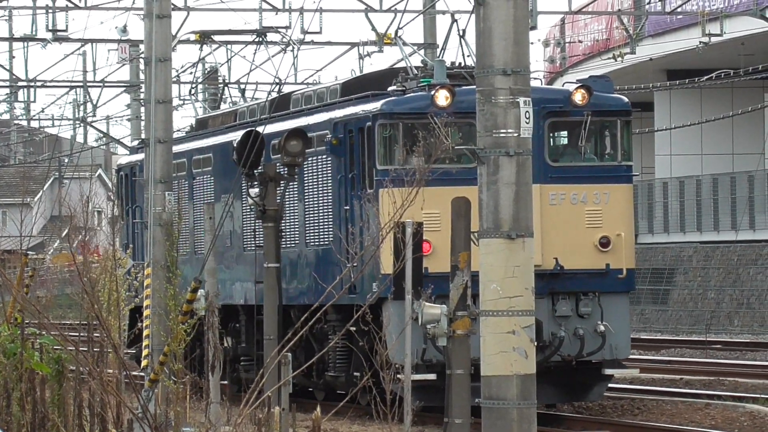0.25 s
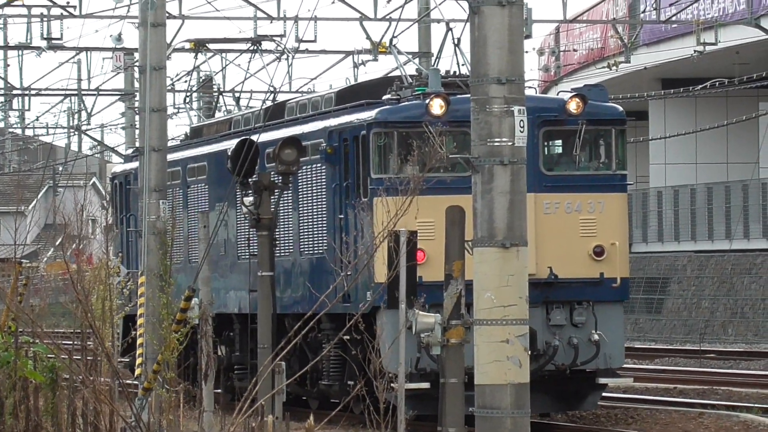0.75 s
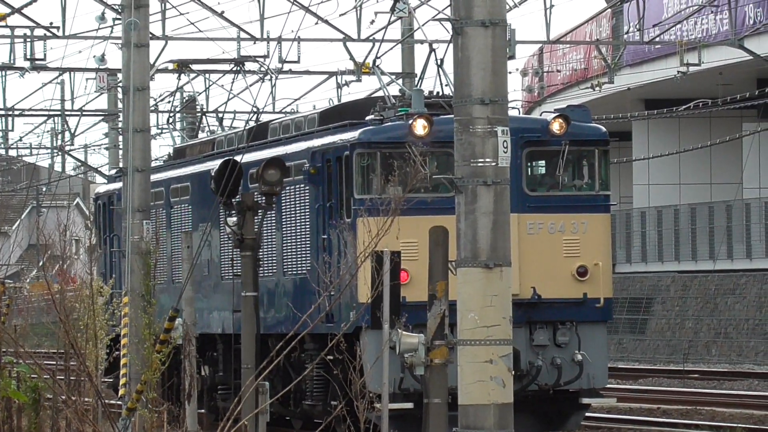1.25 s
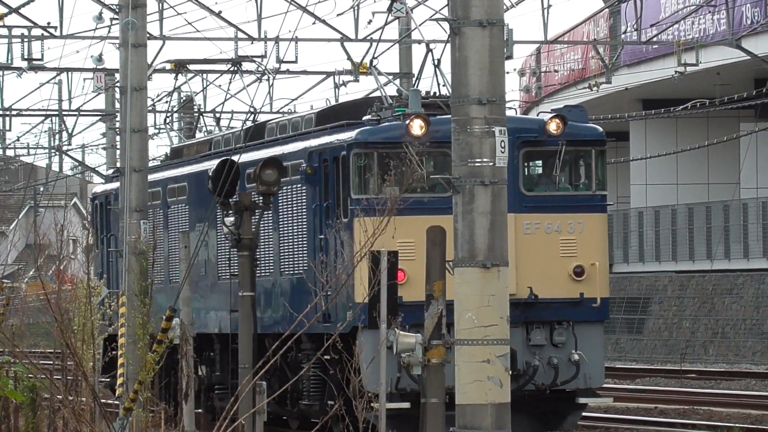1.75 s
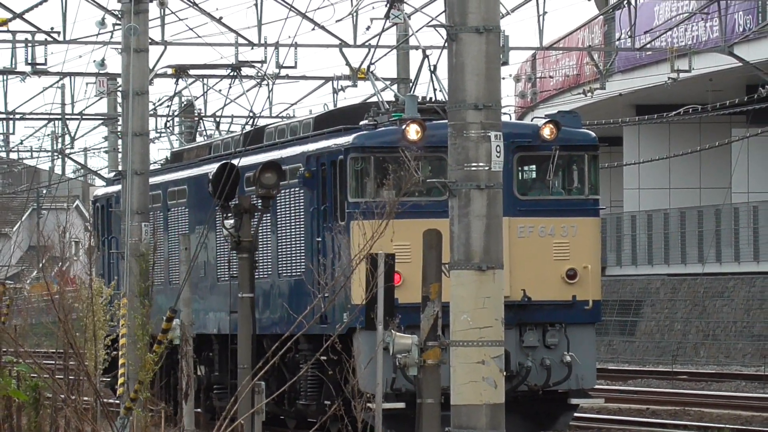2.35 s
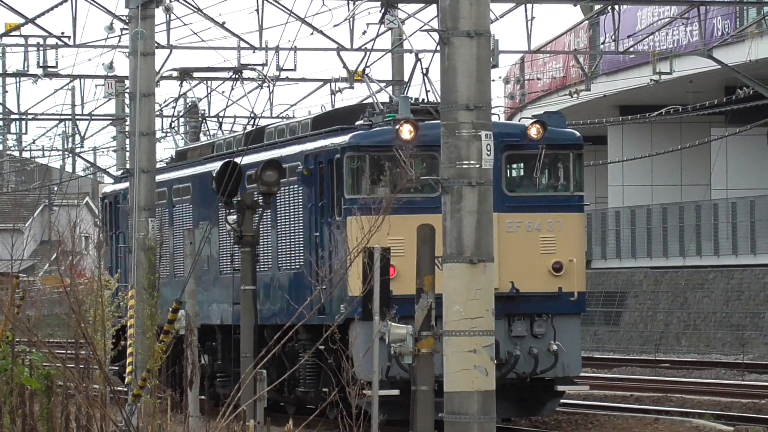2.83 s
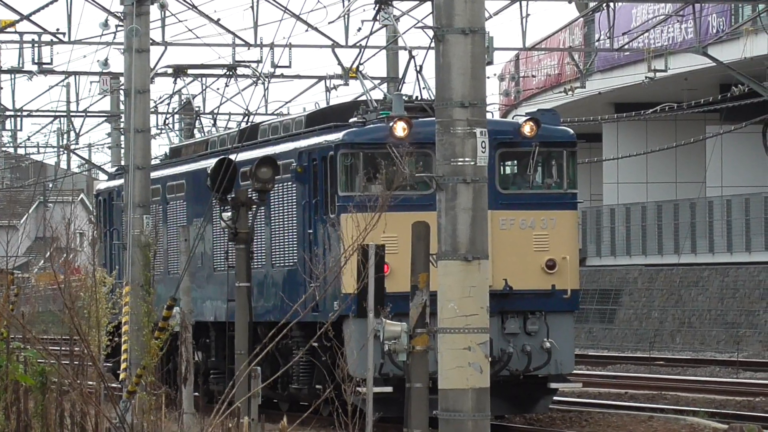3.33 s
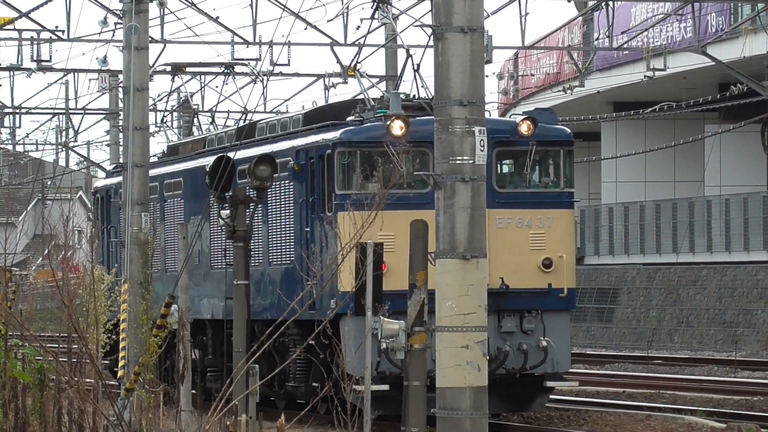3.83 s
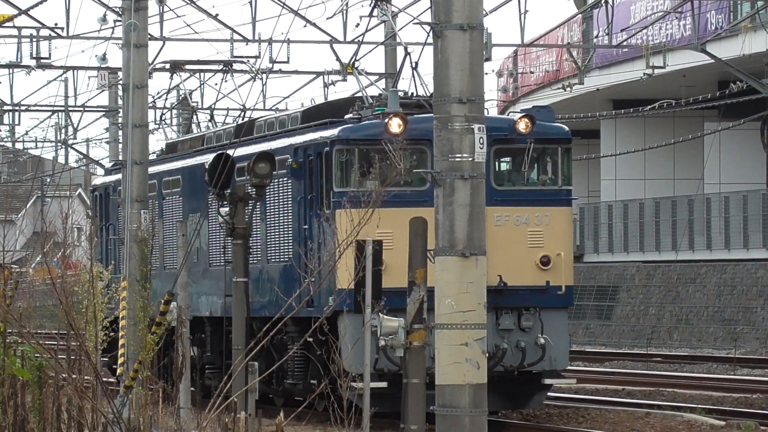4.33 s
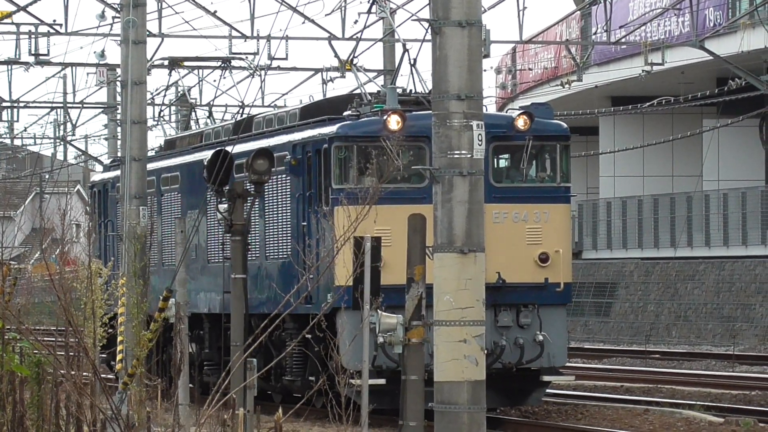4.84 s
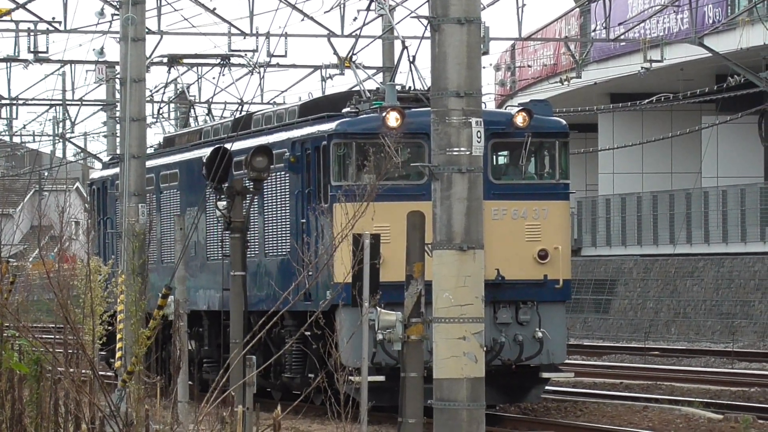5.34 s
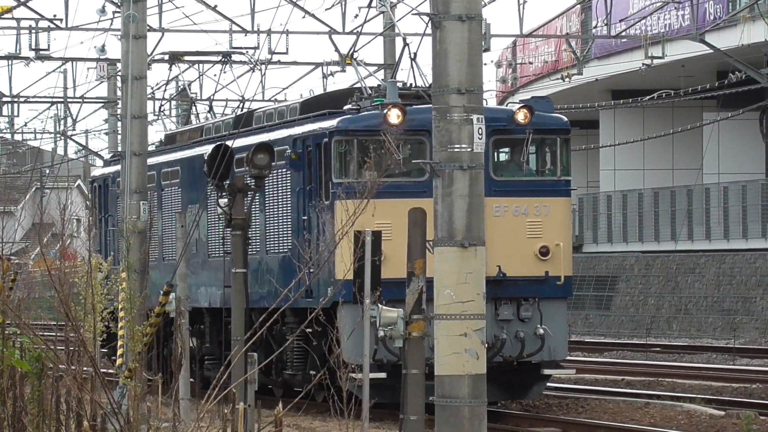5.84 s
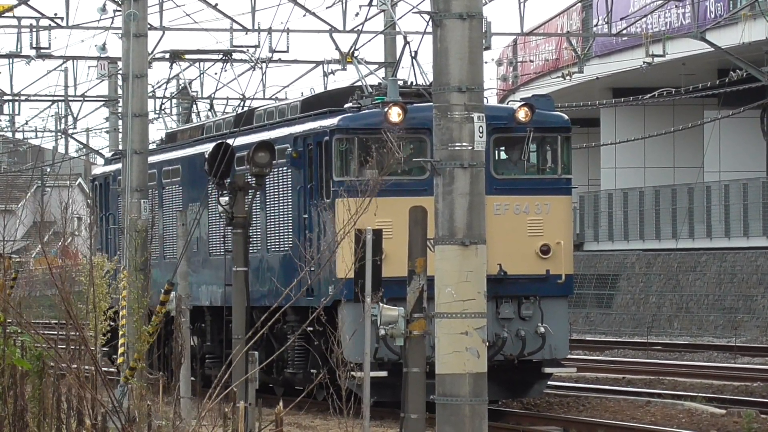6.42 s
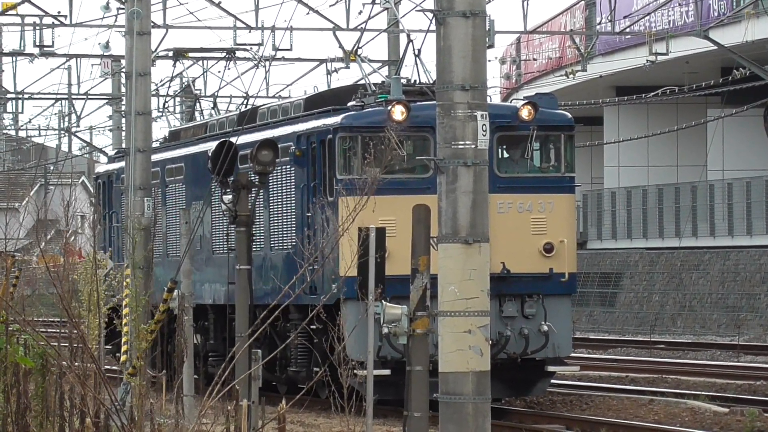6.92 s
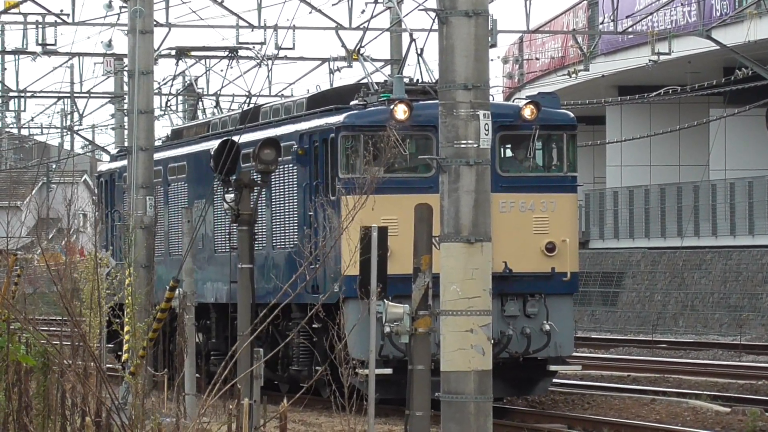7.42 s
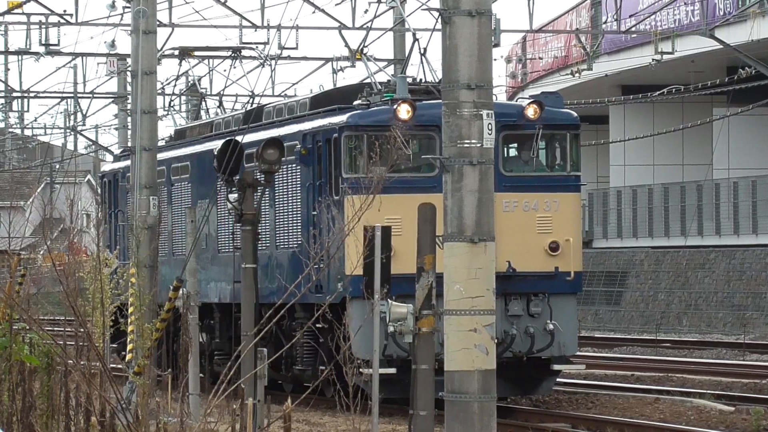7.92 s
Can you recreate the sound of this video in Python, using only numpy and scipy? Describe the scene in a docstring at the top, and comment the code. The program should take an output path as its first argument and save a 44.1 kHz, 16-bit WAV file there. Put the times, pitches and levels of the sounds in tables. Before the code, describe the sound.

Outdoors beside railway tracks, an electric locomotive's cooling blowers hold a dense, beating hum over a broad roar of ducted air and faint grille hiss. A tiny hard tick comes near the start. Just past the middle the brakes bite with a short, shrill, metallic squeal and scrape, followed by a rush of released air that dies away into the unbroken hum. Stereo microphone at a little distance.

```python
"""Electric locomotive braking to a stop

Six cooling blowers hold harmonic blade tones over broadband duct roar and grille hiss, while the locomotive creeps away.
A faint high whistle, a narrow wavering cluster of tones, goes on throughout; a small hard part ticks once.
The shoes grip, and stick-slip friction makes the wheels squeal in their ringing modes over a scrape.
Brake air is then let out as a turbulent jet, a hiss that opens fast and dies away."""
import sys
import numpy as np
from scipy import signal
from scipy.fft import rfft, irfft, next_fast_len
from scipy.io import wavfile
from scipy.ndimage import uniform_filter1d

SR = 44100
rng = np.random.default_rng(int(sys.argv[2]) if len(sys.argv) > 2 else 0)


def int16_out(signal):
    """Quantize to a 16-bit WAV file."""
    q = np.round(np.clip(np.atleast_2d(signal).T, -1, 1) * 32767)
    wavfile.write(sys.argv[1], SR, q.astype(np.int16))


N = 360285
TIME = np.arange(N) / SR
ALL = slice(None)
STOP = slice(round(4.2 * SR), round(5.5 * SR))  # the samples in which the brakes sound
SLOWS_S, SLOWING_S = 4.3, 1.3  # the speed starts to die off; its time constant
CREEP_M_S, SOUND_M_S = .6, 343
SHIFT_S = 0.95  # time scale of a slow level change


def amp(db):
    """Level law: decibels to an amplitude ratio."""
    return 10 ** (np.asarray(db) / 20)


def unit(x):
    """Normalization to unit root-mean-square."""
    return x / np.sqrt(np.mean(np.abs(x) ** 2) + 1e-20)


def along(points, hz):
    """Interpolation of (frequency [Hz], value) on a logarithmic frequency axis."""
    f, v = np.transpose(points)
    return np.interp(np.log(hz + 1), np.log(f + 1), v)


def curves(rows):
    """Linear interpolation in time: one curve for each column after the time."""
    s, *cols = np.transpose(rows)
    return np.array([np.interp(TIME, s, c) for c in cols])


def span(rows):
    """Time gate: 1 between the first and last row, 0 outside."""
    return (TIME > rows[0][0]) & (TIME < rows[-1][0])


def step(at, width, part=ALL):
    """Hyperbolic-tangent transition from 0 to 1 centred on a moment."""
    return .5 + .5 * np.tanh((TIME[part] - at) / width)


def wobble(rate, part=ALL):
    """Random modulation: Gaussian knots, rate a second, joined by straight lines."""
    knots = rng.standard_normal(int(N * rate / SR) + 4)
    return np.interp(TIME[part] * rate, np.arange(len(knots)), knots)


def filtered(x, response):
    """Linear filtering: the spectrum times a complex frequency response."""
    m = next_fast_len(N + 8192)
    return irfft(rfft(x, m) * response(np.fft.rfftfreq(m, 1 / SR)), m)[..., :N]


def rush(spectrum, alike, patchy_db):
    """Turbulent noise of rms 1: shaped spectrum, random patches of gain, partial stereo coherence."""
    z = signal.stft(rng.standard_normal((2, N)), nperseg=512)[2]
    field = rng.standard_normal(z.shape[1:])
    field = uniform_filter1d(field, size=6, axis=0)
    field = uniform_filter1d(field, size=14, axis=1)
    pair = signal.istft(z * amp(patchy_db * unit(field)), nperseg=512)[1][:, :N]

    def mid_side(hz):
        turn = np.arccos(np.clip(along(alike, hz), 0, 1)) / 2
        return amp(along(spectrum, hz)) * [np.cos(turn), np.sin(turn)]

    mid, side = filtered(pair, mid_side)
    return unit(np.array([mid + side, mid - side]))


def tone(hz, rough, width_hz, apart, part=ALL):
    """Narrow-band tone of rms 1: its rough share wanders in size and phase, partly apart in each ear."""
    shared, left, right = (unit(wobble(width_hz, part) + 1j * wobble(width_hz, part)) for _ in range(3))
    rough = np.clip(rough, 0, 1)
    wander = np.sqrt(1 - apart) * shared + np.sqrt(apart) * np.array([left, right])
    turns = np.cumsum(hz * np.ones(len(shared))) / SR
    spin = np.exp(2j * np.pi * (turns + rng.random()))
    return np.sqrt(2) * np.real(spin * (np.sqrt(1 - rough) + np.sqrt(rough) * wander))


def receding():
    """Doppler effect: the factor by which moving away lowers a pitch."""
    speed = CREEP_M_S * np.exp(-np.maximum(TIME - SLOWS_S, 0) / SLOWING_S)
    return 1 - speed / SOUND_M_S


# Blade-pass rate of each blower at rest: (frequency [Hz])
BLADE_PASS = [274.18, 283.43, 294.94, 303.76, 307.43, 311.9]
# Harmonics of each blower, one row each, before shift and pan: (level of multiples 1 to 8 [dB rms])
HARMONICS = [(-42, -47, -51, -64, -60, -69, -72, -74), (-49, -44, -49, -55, -65, -63, -72, -78),
             (-43, -41, -51, -58, -61, -73, -69, -80), (-46, -41, -48, -53, -57, -70, -76, -84),
             (-57, -43, -47, -56, -56, -64, -67, -78), (-45, -37, -49, -58, -60, -69, -67, -75)]
# Left over right for each blower, divided by the harmonic number: (level [dB])
BLOWER_PAN = [3, -4, -5, 7, -6, 5.5]
# Strength changes as the sound paths shift, one row a blower, for multiples 1-2, then 3, then 4-8:
# three times (early level [dB], late level [dB], change at [s])
PATH_SHIFTS = [(0.5, 1, 4, -1.5, -0.5, 4.7, 1, 2.5, 5), (3, -8.5, 3.9, -1, 4.5, 5.2, -9.5, 0.5, 2),
               (-.5, -7, 8.3, -4, 1, 4.7, 0, 4, 5), (-2, -4.5, 4.6, -3.5, 2, 3.9, -4, 4, 5.4),
               (-1.5, 2.5, 5.8, 3.5, -0.5, 3, 0.5, -2.5, 7.2), (-1, 3, 6.4, -3.5, 3.5, 4.9, -2, 1.5, 6.3)]
# Weak steady tones of other machinery: (frequency [Hz], level [dB rms])
MACHINERY = [(584, -49), (959.6, -57), (973, -58), (2190, -74)]
LULL_DB, LULL_AT_S, LULL_S = -7, 3.3, .6  # the third multiples of all blowers dip together


def blowers():
    """Harmonic series of blade passing: each wheel sings multiples of its rate, and neighbours beat."""
    coarse = slice(None, None, 6)  # these low tones need only every sixth sample
    turns = (np.cumsum(receding()) / SR)[coarse]
    lull_db = LULL_DB * np.exp(-.5 * ((TIME[coarse] - LULL_AT_S) / LULL_S) ** 2)
    sides = np.array([[1], [-1]])  # left, right
    out = 0
    for hz, orders, shift, pan_db in zip(BLADE_PASS, HARMONICS, PATH_SHIFTS, BLOWER_PAN):
        hum_db, third_db, whine_db = (
            early + (late - early) * step(at, SHIFT_S, coarse)
            for early, late, at in np.reshape(shift, (3, -1)))
        third_db = third_db + lull_db
        for k, db in enumerate(orders, 1):
            path_db = hum_db if k < 3 else third_db if k == 3 else whine_db
            # echoes and eddies shake each tone
            drift_db = 1.2 * wobble(.8, coarse) + 1.1 * wobble(2, coarse) + 1.5 * wobble(12, coarse)
            lean = rng.normal(0, .17) * sides  # radians: the phase differs a little between the ports
            cycles = k * hz * turns + rng.random() + .075 * wobble(11, coarse)
            wave = np.sqrt(2) * np.sin(2 * np.pi * cycles + lean)
            out = out + amp(db + pan_db / 2 / k * sides + path_db + drift_db) * wave
    out = signal.resample_poly(out, 6, 1, axis=1)[:, :N]
    for hz, db in MACHINERY:
        out += amp(db + 3 * wobble(1.5)) * tone(hz, .2, width_hz=3, apart=.3)
    return out


# Relative spectrum of the duct roar: (frequency [Hz], density [dB per Hz])
DUCT_SPECTRUM = [(15, -51), (40, -20.5), (100, -13), (200, -6), (260, -5.5), (297, -0.5), (350, -8.5),
                 (435, -12.5), (520, -7), (600, -1.5), (680, -7.5), (800, -13), (1200, -15.5), (1600, -25),
                 (2150, -30), (2400, -39), (4000, -62)]
# Relative spectrum of the hiss through the side grilles: (frequency [Hz], density [dB per Hz])
GRILLE_SPECTRUM = [(1410, -25), (2400, -1.5), (2940, -3), (3690, -2), (6020, -16.5), (8760, -11.5),
                   (9030, -12.5), (10400, -18), (13400, -25), (15500, -36)]
# Stereo coherence of the air noise: (frequency [Hz], left-right likeness [0-1])
COHERENCE = [(25, .3), (60, 0.72), (130, 0.95), (290, 0.98), (640, 0.76), (1410, 0.59), (3100, 0.57),
             (6820, 0.13), (15000, .06)]
ROAR_DB, GRILLE_DB = -30, -54.5
UPPER_DB, UPPER_GAIN_DB, UPPER_GAIN_S = 1, 0.35, 5.6  # extra above 700 Hz; its later growth, centred here
BASS_GAIN_DB, BASS_HZ = 0.5, 200  # the lowest roar grows by this much over the stop


def airflow():
    """Turbulent flow noise: air roars in the ducts and hisses through the grilles."""
    roar = rush(DUCT_SPECTRUM, COHERENCE, patchy_db=0.5)
    upper = filtered(roar, lambda hz: 1 / (1 + (700 / (hz + 1)) ** 4))
    bass = filtered(roar, lambda hz: 1 / (1 + (hz / BASS_HZ) ** 4))
    bass_db = BASS_GAIN_DB * (step(SLOWS_S, SLOWING_S) - .5)
    upper_db = UPPER_DB + UPPER_GAIN_DB * step(UPPER_GAIN_S, SHIFT_S)
    roar = roar + (amp(upper_db) - 1) * upper + (amp(bass_db) - 1) * bass
    hiss = rush(GRILLE_SPECTRUM, COHERENCE, patchy_db=1)
    return amp(ROAR_DB + 0.64 * wobble(2.88)) * roar + amp(GRILLE_DB + 0.56 * wobble(4)) * hiss


# Close high tones, before their growth at the stop: (frequency at rest [Hz], level [dB rms])
WHISTLE_TONES = [(9206, -74), (9178, -79), (9135, -85)]
WHISTLE_GAIN_DB = 1.5  # it grows as the locomotive stops


def whistle():
    """Narrow-band modulation: thin close tones near the top of the hiss waver in pitch and strength."""
    growth_db = WHISTLE_GAIN_DB * step(SLOWS_S, SLOWING_S)
    out = 0
    for hz, db in WHISTLE_TONES:
        pitch = hz * receding() + 2 * wobble(6)
        out = out + amp(db + 1.5 * wobble(2) + growth_db) * tone(pitch, .4, width_hz=30, apart=.5)
    return out


# Blows of a part rattling to rest: (time [s], level [dB])
TICK_BLOWS = [(0.1186, -25), (0.119, -13.5), (0.1203, -25), (0.1213, -29)]
# Resonances that the blows excite: (frequency [Hz], width [Hz], level [dB])
TICK_RESONANCES = [(4030, 900, -1), (5200, 1000, -9), (6900, 900, -2), (8800, 1300, 2), (11300, 2200, -7)]


def tick():
    """Impulse response of damped resonators: a small hard part clicks."""
    blows = np.zeros((2, N))
    for s, db in TICK_BLOWS:
        blows[:, round(s * SR)] = amp(db) * rng.choice([-1, 1])

    def resonances(f):
        total = 0
        for k, (centre, width, db) in enumerate(TICK_RESONANCES):
            damping = 1j * f * width
            total = total + (-1) ** k * amp(db) * damping / (centre * centre - f * f + damping)
        return total

    return filtered(blows, resonances)


def swell(start, full, fade, t60):
    """Growth and decay envelope: rises from start to full, holds, then decays by 60 dB in t60."""
    t = TIME[STOP]
    rise = np.clip((t - start) / max(full - start, .005), 0, 1) ** 2
    return rise * amp(-60 * np.maximum(t - fade, 0) / t60)


# Strongest wheel mode, before its surges: (time [s], level [dB])
MAIN_SQUEAL = [(4.255, -73), (4.28, -53), (4.33, -42.5), (4.375, -42), (4.39, -47), (4.42, -38),
               (4.5, -38.5), (4.6, -42.5), (4.72, -34), (4.85, -43.5), (4.93, -47), (5.04, -52.5),
               (5.2, -75)]
# Moments at which that mode sings out clean: (time [s], gain [dB])
CLEAN_SURGES = [(4.538, 9), (4.69, 11), (4.435, 4.5), (4.61, 4.5), (4.79, 0), (5.15, 15)]
# Other wheel modes: (frequency [Hz])
MODE_HZ = [2660, 3470, 3620, 4205, 4390, 5275, 6850, 7300, 7840, 8610, 8760, 8890, 9135, 9440, 9670, 10360,
           10570, 8020, 8400, 10950, 9880, 10150]
# Each of these modes while the shoes bite: (level [dB], width [Hz], to which the tone adds 55)
MODE_BITE = [(-65, 28), (-62, 50), (-58.5, 60), (-63, 62), (-65, 59), (-59, 40), (-74, 130), (-62, 180),
             (-73, 60), (-66, 54), (-61, 72), (-66, 37), (-64, 26), (-69, 50), (-62, 38), (-65, 70),
             (-63, 89), (-69, 60), (-71, 71), (-80, 60), (-70, 90), (-67, 90)]
# One mode rings out clean: (full at [s], mode number from 0, level [dB])
MODE_FLARES = [(4.38, 14, -54), (4.42, 14, -52), (4.375, 4, -53), (4.41, 4, -47), (4.445, 3, -51.5),
               (4.46, 0, -59), (4.41, 8, -60), (4.41, 17, -62), (4.375, 13, -61), (4.37, 10, -67),
               (4.45, 10, -60), (4.7, 19, -68), (4.73, 15, -61), (4.46, 13, -52), (4.45, 8, -61),
               (4.46, 9, -61), (4.46, 16, -61), (4.48, 4, -49), (4.49, 5, -56), (4.51, 8, -61),
               (4.51, 12, -52), (4.525, 14, -48), (4.55, 4, -57), (4.53, 5, -57), (4.57, 5, -53),
               (4.53, 11, -51), (4.57, 11, -47), (4.57, 12, -53), (4.57, 14, -52), (4.61, 3, -59),
               (4.61, 5, -45), (4.62, 16, -56), (4.63, 10, -56), (4.6, 4, -60), (4.65, 4, -55),
               (4.65, 5, -46), (4.64, 1, -57), (4.69, 14, -60), (4.68, 12, -62), (4.72, 0, -59),
               (4.77, 3, -64), (4.93, 2, -62), (4.72, 5, -55), (4.78, 5, -60), (4.8, 11, -63),
               (4.82, 12, -64), (4.84, 5, -55), (4.84, 4, -64), (4.85, 14, -64), (4.87, 2, -62),
               (4.88, 5, -57), (4.97, 5, -63), (5.05, 5, -67)]
# Highest tones, rough and drifting:
# (first frequency [Hz], last frequency [Hz], level [dB], full at [s], fades from [s], fade t60 [s])
HIGHEST_TONES = [(11450, 11340, -61, 4.48, 4.57, .8), (12370, 12350, -57, 4.55, 4.66, 1.1),
                 (14040, 14210, -61, 4.48, 4.74, .75)]
GRIP_S, EASE_S = 4.38, 4.68  # the shoes bite hard; they begin to ease off
SURGE_S = 0.012
SQUEAL_HZ, LEAD_IN_HZ = 7000, 18  # higher by the second before the bite
GLIDE_HZ, GLIDE_AT_S, GLIDE_S = 95, 4.55, .07  # it glides up
ROUGH_LEAD_IN, ROUGH_GRIP, ROUGH_PER_S = .02, 0.6, 1  # roughness before the bite, added at it, growth after
TWIN_DB = -3  # a second wheel just above, relative to the first, from the bite on
BITE_RISE_S, BITE_T60_S = 0.12, 1
FLARE_RISE_S, FLARE_HOLD_S, FLARE_T60_S, FLARE_ROUGH = 0.04, 0.025, 0.2, .27
WANDER_HZ, FLUTTER_DB = 16, 1.8  # each mode strays in pitch and flutters in strength
HIGHEST_RISE_S, HIGHEST_WIDTH_HZ = 0.25, 260
SCRAPE_DB, SCRAPE_RISE_S, SCRAPE_EASE_S, SCRAPE_T60_S = -50, .04, 4.58, 1.25


def main_squeal():
    """Stick-slip self-excitation: friction keeps the strongest mode ringing, with a twin and a skirt."""
    t = TIME[STOP]
    db = curves(MAIN_SQUEAL)[0, STOP]
    on = span(MAIN_SQUEAL)[STOP]
    bitten = step(GRIP_S, .012, STOP)
    hz = SQUEAL_HZ + LEAD_IN_HZ * (1 - bitten) + GLIDE_HZ * step(GLIDE_AT_S, GLIDE_S, STOP)
    surge_db = sum(gain_db * np.exp(-.5 * ((t - s) / SURGE_S) ** 2) for s, gain_db in CLEAN_SURGES)
    rough = ROUGH_LEAD_IN + bitten * (ROUGH_GRIP + ROUGH_PER_S * (t - GRIP_S))
    rough = rough * amp(-surge_db)  # a surge is also purer
    line = amp(db + surge_db) * tone(hz, rough, 70, .9, STOP)
    twin = bitten * amp(db + TWIN_DB) * tone(hz + 48, .7, 100, .9, STOP)
    # chatter spreads a faint skirt round the line
    skirt = amp(uniform_filter1d(db, size=6000) - 22) * tone(hz + 60, 1, 350, .7, STOP)
    return on * (line + twin + skirt)


def wheel_modes():
    """Modal excitation: stick-slip rings many wheel modes, some flaring up for a moment."""
    bite = swell(GRIP_S - BITE_RISE_S / 2, GRIP_S + BITE_RISE_S, EASE_S, BITE_T60_S)
    flare_power = np.zeros((len(MODE_BITE), len(bite)))
    for full, mode, level_db in MODE_FLARES:
        envelope = swell(full - FLARE_RISE_S, full, full + FLARE_HOLD_S, FLARE_T60_S)
        flare_power[mode] += (amp(level_db) * envelope) ** 2
    ring = 0
    for mode_hz, (level_db, width), flare in zip(MODE_HZ, MODE_BITE, flare_power):
        steady = (amp(level_db) * bite) ** 2
        power = steady + flare
        rough = (steady * min(width / 55, 1) + flare * FLARE_ROUGH) / (power + 1e-20)
        pitch = mode_hz + WANDER_HZ * wobble(18, STOP)
        flutter = amp(FLUTTER_DB * wobble(45, STOP))
        ring = ring + np.sqrt(power) * flutter * tone(pitch, rough, width + 55, .8, STOP)
    for first_hz, last_hz, level_db, full, fade, t60 in HIGHEST_TONES:
        glide = first_hz + (last_hz - first_hz) * step(GLIDE_AT_S, GLIDE_S, STOP)
        envelope = amp(level_db) * swell(full - HIGHEST_RISE_S, full, fade, t60)
        ring = ring + envelope * tone(glide, .9, HIGHEST_WIDTH_HZ, 0.94, STOP)
    return ring


def scrape():
    """Sliding-friction noise: the shoes rub the treads from the bite on."""
    # relative spectrum: (frequency [Hz], density [dB per Hz])
    spectrum = [(2000, -26), (2600, -1), (3700, -8), (4800, -2), (6800, -30), (7700, -7), (8300, -12),
                (9000, -3), (10700, -6), (11200, -44)]
    rub = rush(spectrum, [(9000, 0.3)], patchy_db=-1.5)[:, STOP]
    envelope = swell(GRIP_S - SCRAPE_RISE_S / 2, GRIP_S + SCRAPE_RISE_S, SCRAPE_EASE_S, SCRAPE_T60_S)
    return amp(SCRAPE_DB) * envelope * rub


def brakes():
    """Superposition: squeal, wheel modes and scrape add within the braking interval."""
    out = np.zeros((2, N))
    out[:, STOP] = main_squeal() + wheel_modes() + scrape()
    return out


# Relative spectrum of the air jet: (frequency [Hz], density [dB per Hz])
JET_SPECTRUM = [(1470, -32), (2500, 0), (3190, -2.5), (3890, 2.5), (5400, -2), (5700, -5), (8730, 2),
                (12000, -13), (14000, -23), (15500, -28)]
VENT_DB, VENT_OPENS_S, VENT_FILL_S, VENT_SHUTS_S, VENT_SAG_DB_PER_S = -41.7, 5.09, .125, 5.55, 10
VENT_T60_S, LINGER_DB, LINGER_T60_S = 1.3, -5.5, 2.3  # the jet dies fast, its last leak slowly
DULLS_DB_PER_S, DULLS_HZ, BLOOM_S = 12, 11500, 0.08  # the jet's top blooms later and fades sooner


def vent():
    """Jet noise of brake-cylinder air: the flow opens fast, sags with the pressure, dies away."""
    t = np.maximum(TIME - VENT_OPENS_S, 0)
    flow = (1 - np.exp(-t / VENT_FILL_S)) * amp(-VENT_SAG_DB_PER_S * t)
    shut = np.maximum(TIME - VENT_SHUTS_S, 0)
    flow *= np.maximum(amp(-60 * shut / VENT_T60_S), amp(LINGER_DB - 60 * shut / LINGER_T60_S))
    jet = rush(JET_SPECTRUM, [(5000, .25)], patchy_db=.8)
    top = filtered(jet, lambda hz: 1 / (1 + (DULLS_HZ / (hz + 1)) ** 8))
    top_gain = amp(-DULLS_DB_PER_S * (t - 0.96)) * (1 - np.exp(-t / BLOOM_S))
    jet = jet + (top_gain - 1) * top
    return flow * amp(VENT_DB + 0.72 * wobble(120)) * jet


def scene():
    """Superposition: all sources add linearly."""
    return blowers() + airflow() + whistle() + tick() + brakes() + vent()


# Colour difference of the ports: (frequency [Hz], left over right level [dB])
PORT_BALANCE = [(60, -1), (110, -2.5), (200, -1), (380, 0.5), (700, 0.5), (1290, -1), (2380, -1),
                (4400, -2.5), (8120, 2.5), (15000, -1.5)]
# Phase difference of the ports: (frequency [Hz], left port lead [rad])
PORT_LEAD = [(25, 1.5), (60, 1), (130, .35), (430, .3), (1500, .02), (6000, -.3), (7000, -.7), (9000, -.4)]
TOP_HZ = 15500  # band limit


def record(dry):
    """Interchannel transfer: two microphone ports differ in colour and phase, below a band limit."""
    half = np.array([[.5], [-.5]])  # each port takes half the difference

    def ports(hz):
        colour = amp(along(PORT_BALANCE, hz) * half)
        phase = np.exp(1j * along(PORT_LEAD, hz) * half)
        return colour * phase * (hz < TOP_HZ)

    return filtered(dry, ports)


dry = scene()
out = record(dry)
int16_out(out)
```